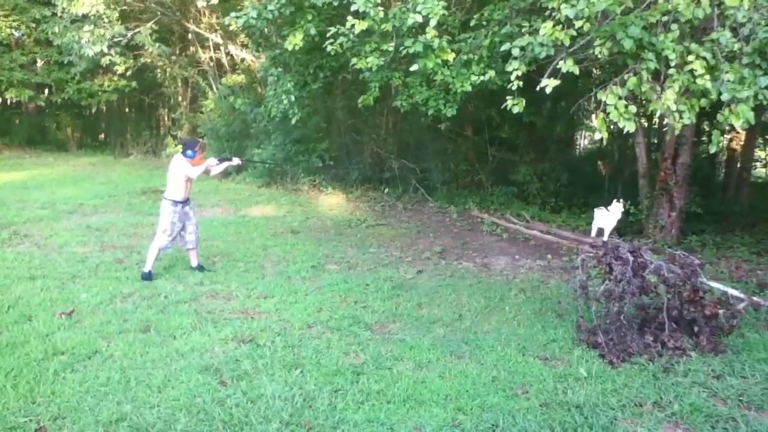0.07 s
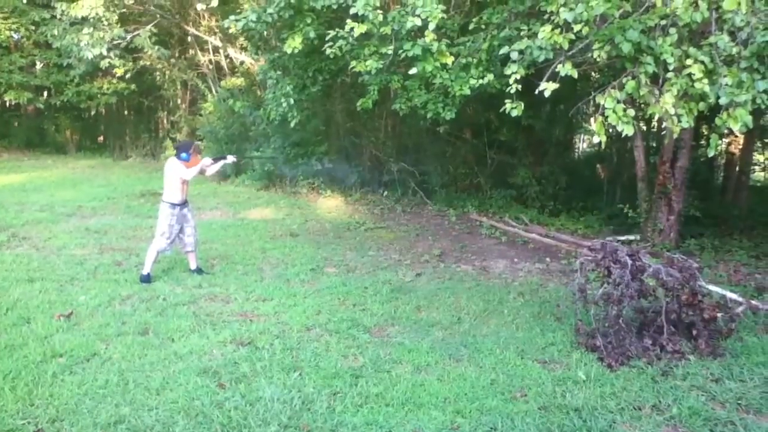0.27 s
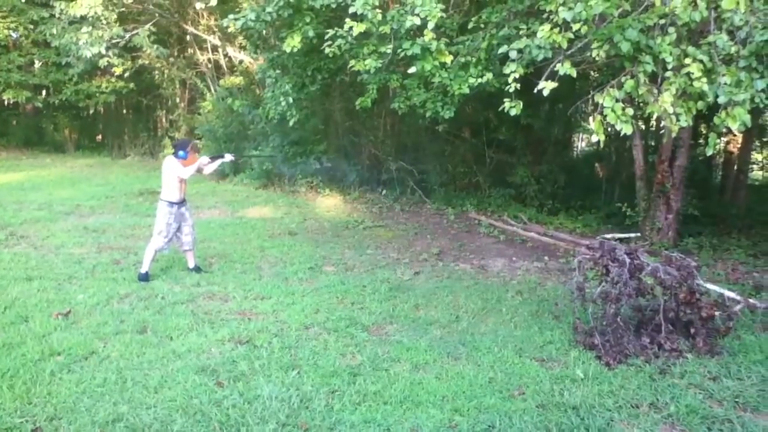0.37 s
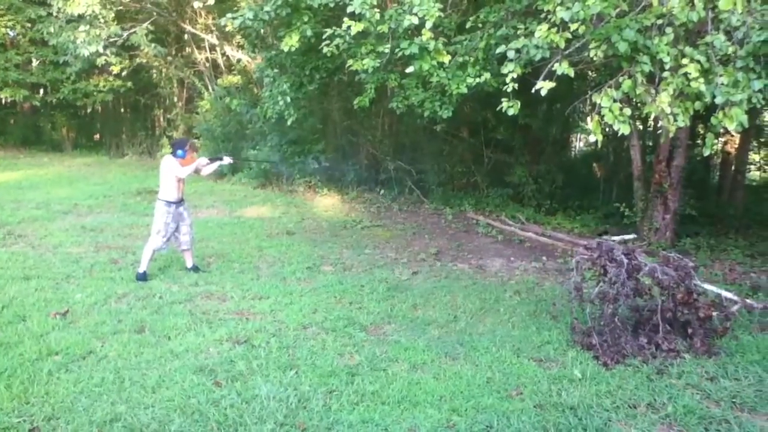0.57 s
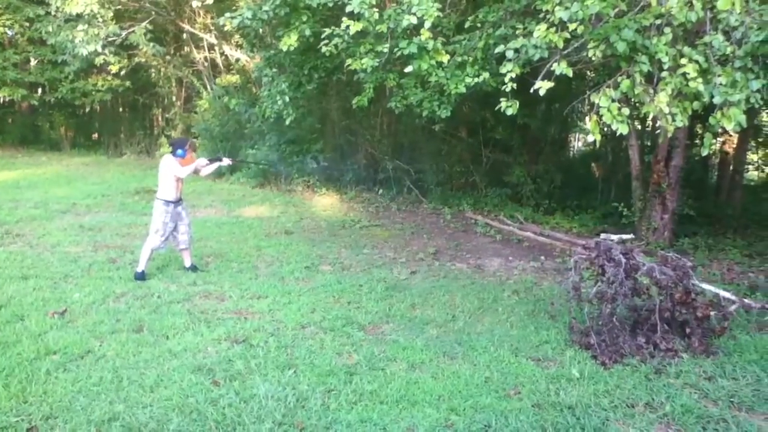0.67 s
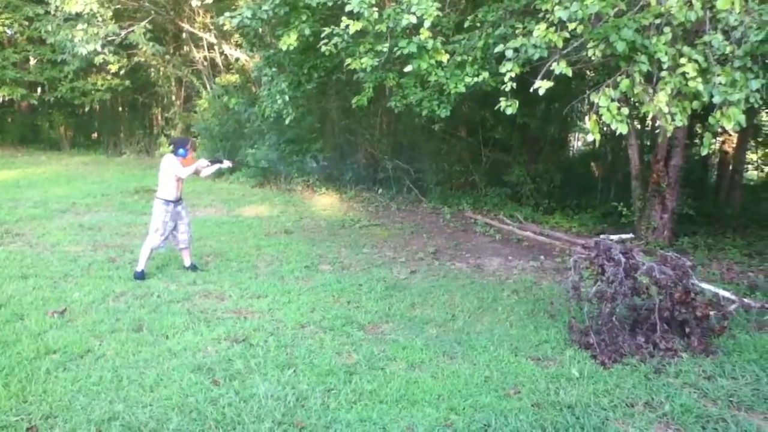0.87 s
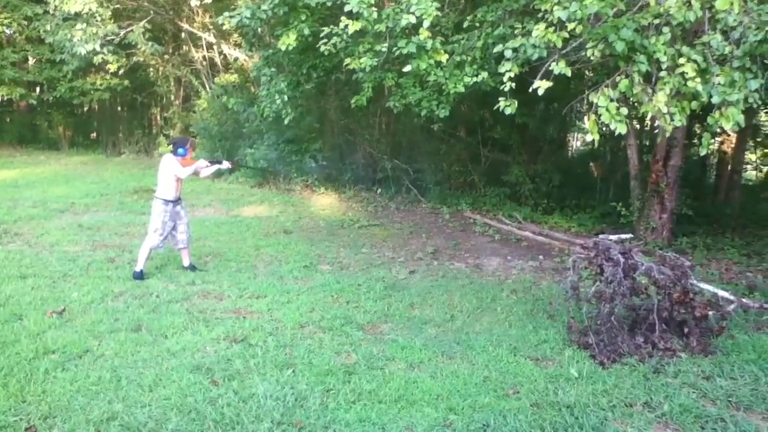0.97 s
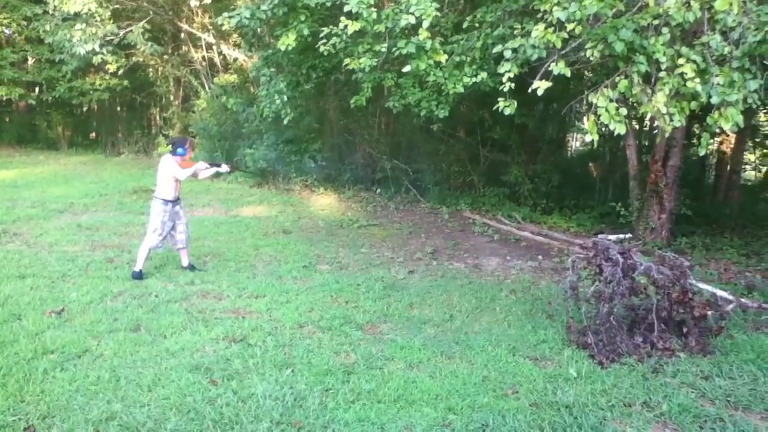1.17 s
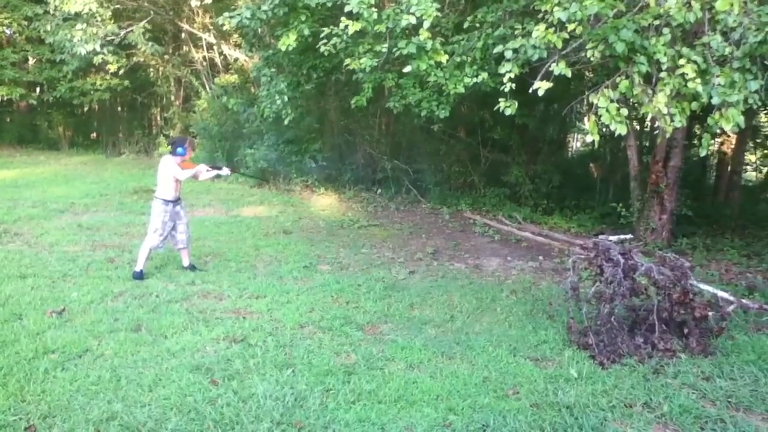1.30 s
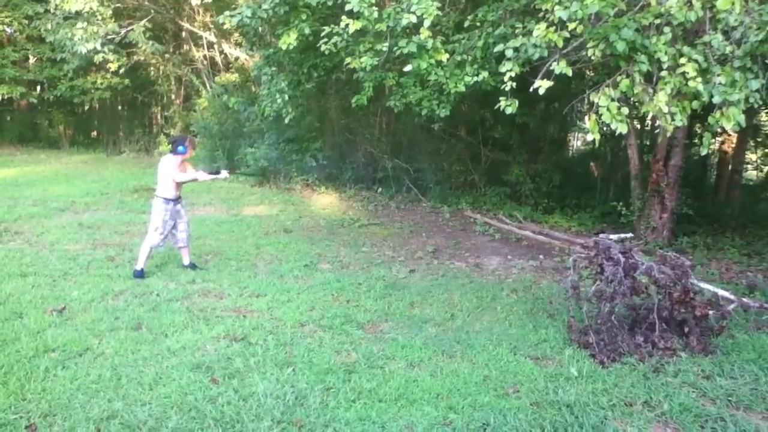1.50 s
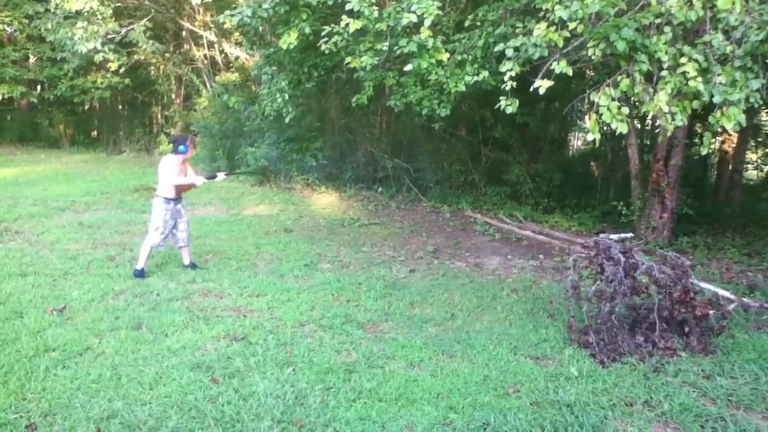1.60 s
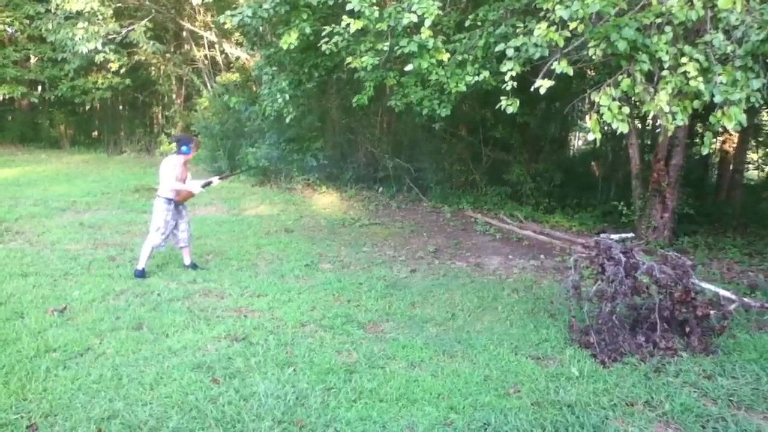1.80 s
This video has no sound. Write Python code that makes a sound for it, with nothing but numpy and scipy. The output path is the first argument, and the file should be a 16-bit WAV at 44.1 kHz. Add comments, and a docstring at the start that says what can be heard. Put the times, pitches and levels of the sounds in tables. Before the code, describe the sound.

A shotgun fires once in a yard, its echo fading through the woods.

```python
"""One shotgun blast in a grassy yard edged by trees, heard through an overloaded microphone.
A sharp crack precedes the blast of the expanding muzzle gas. Near trunks reflect it as slaps and a boom,
foliage scatters it into a bright tail, and half a second later distant woods return a duller roll.
Beneath lie steady outdoor noise, the fading roll of an earlier shot and a few faint ticks."""
import sys
import numpy as np
from scipy import signal
from scipy.fft import rfft, irfft, next_fast_len
from scipy.io import wavfile
from scipy.ndimage import map_coordinates

SR = 44100
rng = np.random.default_rng(int(sys.argv[2]) if len(sys.argv) > 2 else 0)


def log_audio(samples):
    """Write samples as a 16-bit WAV file to the path given in sys.argv[1]."""
    # one column per channel
    frames = np.atleast_2d(samples).T
    # limit to full scale, then quantise
    limited = np.clip(frames, -1, 1)
    pcm = np.round(limited * 32767).astype(np.int16)
    wavfile.write(sys.argv[1], SR, pcm)


N = 81585
SHOT_S = 0.2457


def amp(db):
    """Amplitude grows tenfold every 20 dB."""
    return 10 ** (np.asarray(db) / 20)


def unit(x):
    """Normalisation to rms 1."""
    return x / np.sqrt(np.mean(x ** 2) + 1e-20)


def along(points, hz):
    """Interpolation on a logarithmic frequency axis."""
    knots_hz, values = np.transpose(points)
    return np.interp(np.log(hz + 1), np.log(knots_hz + 1), values)


def since(start):
    """Time of each sample after start, in seconds."""
    return np.arange(N) / SR - start


def fade(t, t60):
    """Exponential decay from t = 0, by 60 dB every t60."""
    return np.exp(-np.log(1000) * np.maximum(t, 0) / t60)


def wobble(rate):
    """Smooth random modulation, rate knots a second."""
    return map_coordinates(rng.standard_normal(N), [np.arange(N) * rate / SR], mode="wrap")


def filtered(x, response):
    """Filtering multiplies the spectrum by a frequency response."""
    size = next_fast_len(N + SR // 2)
    return irfft(rfft(x, size) * response(np.fft.rfftfreq(size, 1 / SR)), size)[:N]


def shaped(x, colour):
    """A minimum-phase filter is causal: nothing sounds ahead of a hit."""
    size = 2 * next_fast_len(len(x), True)
    cepstrum = irfft(np.log(amp(along(colour, np.fft.rfftfreq(size, 1 / SR)))), size)
    cepstrum[1:size // 2] *= 2
    cepstrum[size // 2 + 1:] = 0
    return irfft(rfft(x, size) * np.exp(rfft(cepstrum)), size)[:len(x)]


def noise(colour):
    """Spectral shaping turns white noise into coloured noise of rms 1."""
    return unit(filtered(rng.standard_normal(N), lambda hz: amp(along(colour, hz))))


def burst(t, colour, hold, t60, rise=0.00013):
    """A noise transient with linear attack and exponential decay; times in seconds."""
    envelope = np.clip(t / rise, 0, 1) * fade(t - hold, t60)
    return unit(noise(colour) * envelope) * np.sqrt(np.mean(envelope ** 2))


def blast_wave(t, overpressure_s):
    """A blast wave is a jump in pressure followed by a longer suction."""
    age = np.maximum(t, 0) / overpressure_s
    return (t >= 0) * (1 - age) * np.exp(-age)


GRAIN_DB, GRAIN_HZ = 1.1, 500  # modulation by single echoes
CLUMP_DB, CLUMP_HZ = 0.46, 100  # and by clumps of them
def scatter(start, rise, hold, colour, t60):
    """Diffuse scattering: countless echoes merge into grainy noise, each frequency at its own decay."""
    grainy = noise(colour) * unit(amp(GRAIN_DB * wobble(GRAIN_HZ) + CLUMP_DB * wobble(CLUMP_HZ)))
    hz, t, spectra = signal.stft(grainy, SR, nperseg=512)
    decay = fade(t - start - hold, along(t60, hz)[:, None])
    tail = signal.istft(spectra * decay, SR)[1][:N]
    return tail * np.clip(since(start) / rise, 0, 1)


def slaps(echoes, colour, pulse_weight=0.54):
    """A rough reflector returns a coherent, dulled blast pulse and a short diffuse smear."""
    out = np.zeros(N + SR)
    t = since(0)[:SR // 10]
    envelope = fade(t, t60=0.019)
    pulse = unit(shaped(blast_wave(t, overpressure_s=0.00013), colour))
    for start, db in echoes:
        smear = unit(shaped(rng.standard_normal(len(t)) * envelope, colour))
        slap = pulse_weight * pulse + np.sqrt(1 - pulse_weight ** 2) * smear
        out[round(start * SR):][:len(t)] += amp(db) * slap * np.sqrt(np.mean(envelope ** 2))
    return out[:N]


# Background spectrum. Each row: frequency in Hz, relative level in dB.
AIR_SPECTRUM = [(20, 3), (32, 0), (43, -20), (57, 3), (75, -13), (130, -15.5), (1000, -20.5), (4000, -26.5),
                (6000, -33), (7700, -30.5), (8800, -40), (15500, -53)]
def outdoor_air():
    """Stationary noise forms the outdoor background."""
    return amp(-47) * noise(AIR_SPECTRUM)


# Spectrum of the earlier roll. Each row: frequency in Hz, relative level in dB.
EARLIER_SPECTRUM = [(30, -28), (120, -12), (250, -7), (500, 1), (700, 4), (1000, -3.5), (1500, -4.5),
                    (2300, -16.5), (4000, -25), (8000, -43.5)]
def earlier_roll():
    """The reverberation of an earlier shot decays exponentially."""
    clumps = amp(CLUMP_DB * wobble(CLUMP_HZ))
    return amp(-38) * noise(EARLIER_SPECTRUM) * clumps * fade(since(0), t60=2.2)


# Faint ticks. Each row: start in seconds, level in dB.
TICK_EVENTS = [(1.066, -46), (1.272, -55), (1.3312, -38.5)]
# Their spectrum. Each row: frequency in Hz, relative level in dB.
TICK_SPECTRUM = [(1000, -35), (5000, -20), (6200, 6), (6900, -9), (7700, -4), (8600, -22), (10500, -18),
                 (12500, -27), (15000, -36)]
def ticks():
    """Rapidly damped treble transients are heard as dry ticks."""
    return sum(amp(db) * burst(since(start), TICK_SPECTRUM, hold=0, t60=0.01) for start, db in TICK_EVENTS)


# Spectrum of the distant roll. Each row: frequency in Hz, relative level in dB.
WOODS_SPECTRUM = [(30, -60), (100, -17), (200, -12), (400, -3), (700, 2), (1000, -2.5), (1500, -5.5),
                  (2300, -13), (4000, -19), (7000, -40.5), (12000, -59)]
# Its decay. Each row: frequency in Hz, reverberation time in seconds.
WOODS_DECAY = [(150, 4.7), (700, 3.53), (1500, 2.86), (3500, 2.08), (8000, 1.07)]
# Thuds within the roll. Each row: arrival in seconds, level in dB.
THUD_ECHOES = [(.782, -23), (.795, -26), (.910, -24), (1.157, -29), (1.364, -31)]
# Their spectrum. Each row: frequency in Hz, relative level in dB.
THUD_SPECTRUM = [(60, -35), (150, -10), (300, -1.5), (700, 3), (1300, -11), (2500, -25), (10000, -62)]
def distant_woods():
    """Propagation delay: far trees return a late, dull roll with a few distinct thuds."""
    roll = amp(-28.5) * scatter(start=0.74, rise=0.022, hold=0.28, colour=WOODS_SPECTRUM, t60=WOODS_DECAY)
    return roll + slaps(THUD_ECHOES, THUD_SPECTRUM)


# Spectra of the four near returns. Each row: frequency in Hz, relative level in dB.
SPLASH_SPECTRUM = [(100, -7.5), (500, -1), (1200, 0), (2500, 0.5), (4800, 0), (8000, -7.5), (11000, -16.5),
                   (15500, -22)]
BOOM_SPECTRUM = [(40, -50), (90, -24), (180, -1.5), (300, 2), (500, 5), (650, 4.5), (900, -16), (2500, -20),
                 (10000, -60)]
LEAF_SPECTRUM = [(30, -48), (60, -39), (110, -13), (200, -11), (400, -5), (750, 1), (1500, -0.5),
                 (2300, -5.5), (4000, -4), (6000, -10.5), (8500, -17.5), (11000, -22.5), (15500, -44)]
TRUNK_SPECTRUM = [(40, -39), (100, -8.5), (170, -8), (330, -3), (700, 6), (1500, 3), (2500, -15),
                  (5000, -10), (9000, -20), (15000, -109)]
# Decay of the foliage tail. Each row: frequency in Hz, reverberation time in seconds.
LEAF_DECAY = [(60, 1.9), (300, 2), (800, 2.32), (3000, 1.75), (5500, 1.45), (8500, 1.22), (13000, 0.75)]
# Reflections off trunks. Each row: arrival in seconds, level in dB.
TRUNK_ECHOES = [(.2705, -12.5), (.2770, -11.5), (.2795, 0), (0.2843, -11.5), (0.2863, -15), (0.2966, -21),
                (0.3017, -7), (0.307, -16), (.3180, -8), (0.325, -9.5), (0.3384, -11.5), (0.346, -29),
                (0.354, -8.5), (0.3705, -11), (0.4129, -13.5), (.4350, -20), (0.45, -15.5), (.4680, -13.5),
                (.4760, -15.5)]
def near_trees():
    """Early reflections give a bright splash, a boom and slaps; scattering by foliage adds a tail."""
    splash = amp(-14) * burst(since(SHOT_S), SPLASH_SPECTRUM, hold=0.041, t60=0.15, rise=0.0062)
    boom = amp(-18) * burst(since(0.272), BOOM_SPECTRUM, hold=0.031, t60=0.034, rise=0.012)
    tail = amp(-14) * scatter(SHOT_S, rise=0.04, hold=0, colour=LEAF_SPECTRUM, t60=LEAF_DECAY)
    return splash + boom + slaps(TRUNK_ECHOES, TRUNK_SPECTRUM) + tail


# The crack, then the muzzle blast. Each row: start in seconds, level in dB, hold and t60 in seconds.
SHOCK_FRONTS = [(0.2454, -10, .0012, 0.0049), (0.2481, -7.5, 0.0031, 0.035)]
# Spectra of the fronts and the thump. Each row: frequency in Hz, relative level in dB.
FRONT_SPECTRUM = [(40, -13), (200, -9), (600, 3), (1500, 4), (3000, -3.5), (4600, 2), (7000, -5.5),
                  (10000, -11), (15000, -23)]
THUMP_SPECTRUM = [(20, -3), (50, 2), (100, -14), (250, -24), (1000, -38), (8000, -60)]
def shotgun():
    """Direct sound: two shock fronts, the second with the low thump of expanding muzzle gas."""
    fronts = sum(amp(db) * burst(since(start), FRONT_SPECTRUM, hold, t60)
                 for start, db, hold, t60 in SHOCK_FRONTS)
    muzzle_s = SHOCK_FRONTS[-1][0]
    gas_push = blast_wave(since(muzzle_s), overpressure_s=0.0038)
    return fronts + amp(-14) * shaped(gas_push, THUMP_SPECTRUM)


def scene():
    """Superposition: the shot, its echoes and the background add in one channel."""
    return (shotgun() + near_trees() + distant_woods() + earlier_roll() + ticks() + outdoor_air())[None]


CLIP_LEVEL, CLIP_HARDNESS = 0.59, 3.2
LOW_CUT_HZ, TOP_HZ, TAPER_HZ = 99, 16000, 500
def record(dry):
    """Saturation in the microphone rounds the peaks; its limited band cuts bass and extreme treble."""
    clipped = dry[0] / (1 + np.abs(dry[0] / CLIP_LEVEL) ** CLIP_HARDNESS) ** (1 / CLIP_HARDNESS)
    thinned = signal.sosfilt(signal.butter(3, LOW_CUT_HZ, "highpass", fs=SR, output="sos"), clipped)
    return filtered(thinned, lambda hz: np.clip((TOP_HZ - hz) / TAPER_HZ, 0, 1))[None]


dry = scene()
out = record(dry)
log_audio(out)
```